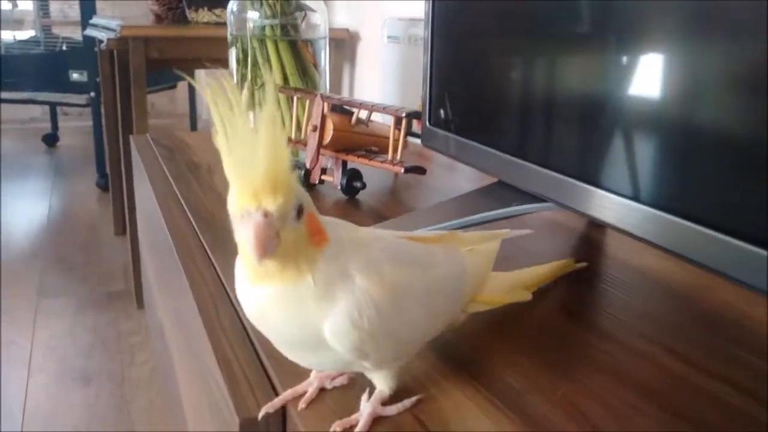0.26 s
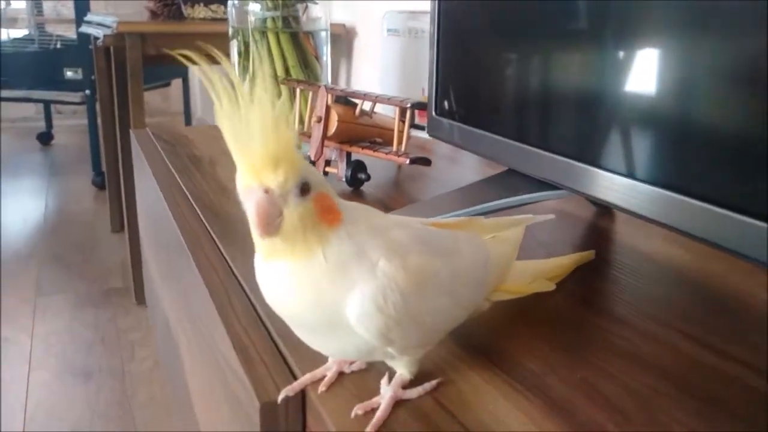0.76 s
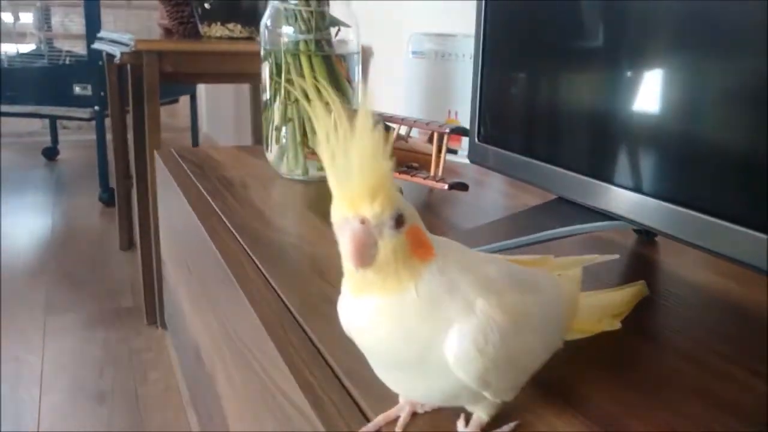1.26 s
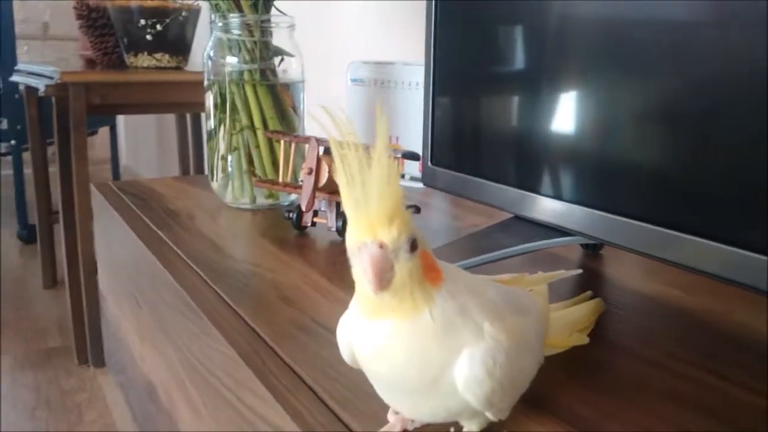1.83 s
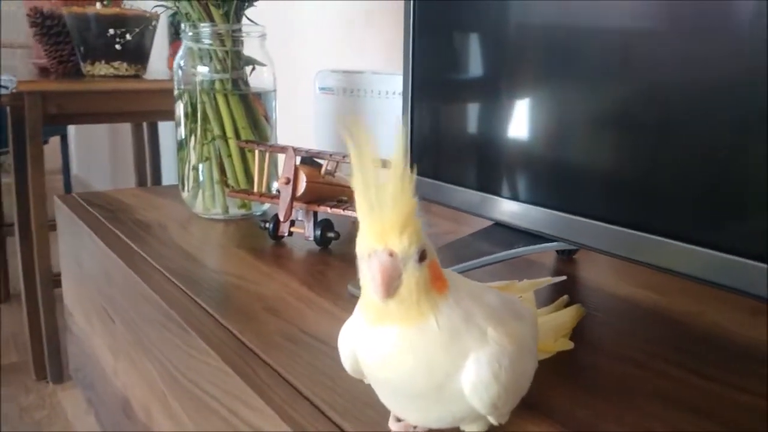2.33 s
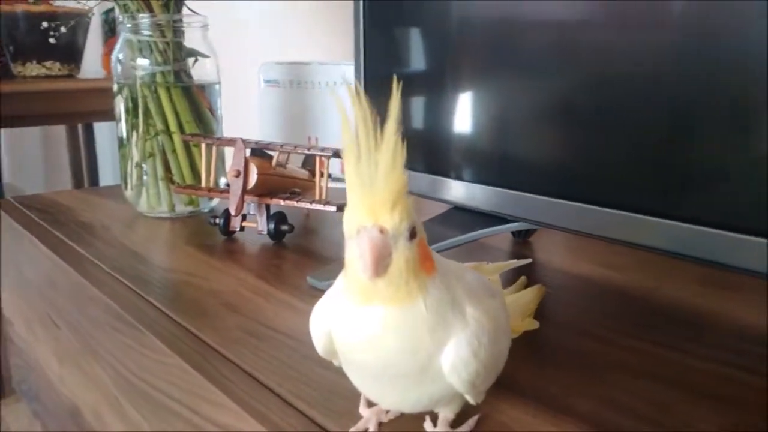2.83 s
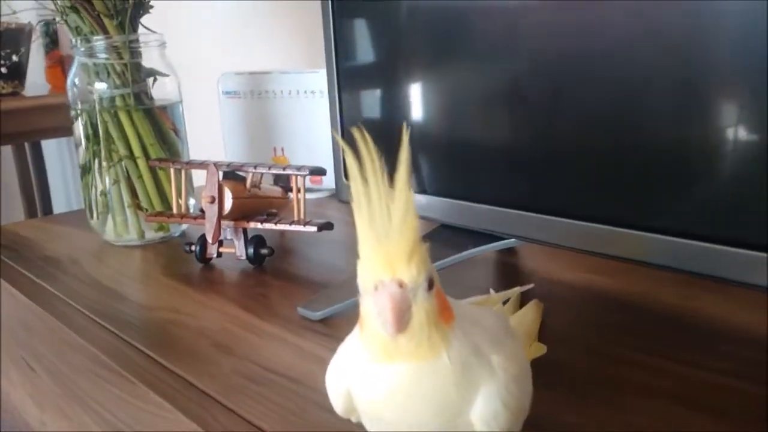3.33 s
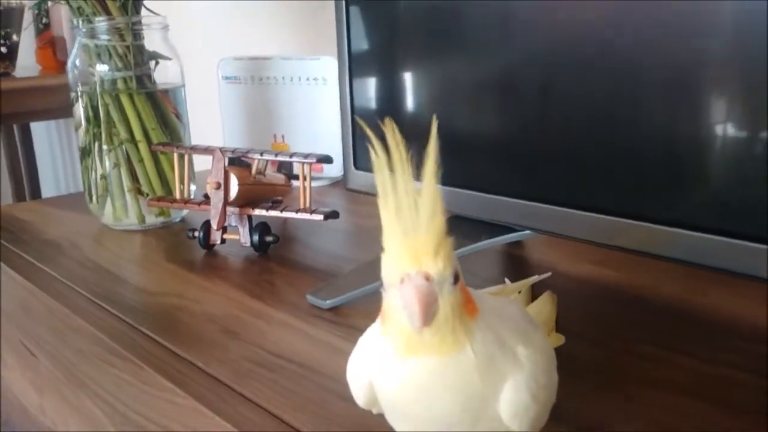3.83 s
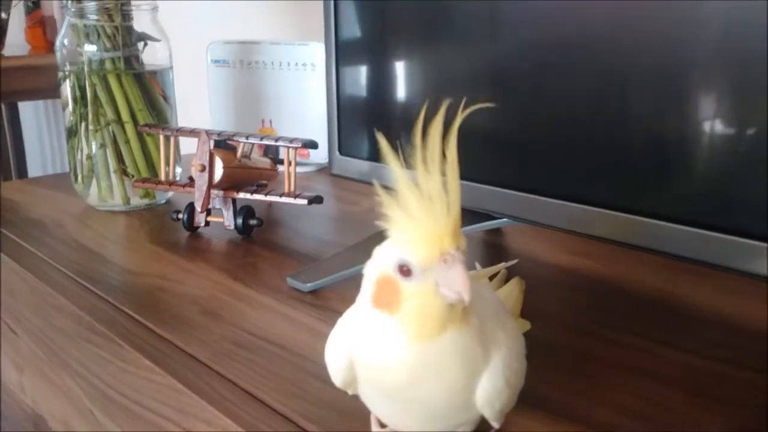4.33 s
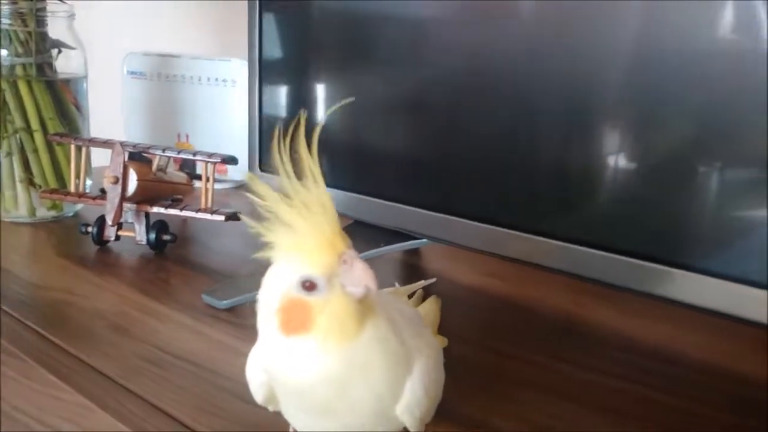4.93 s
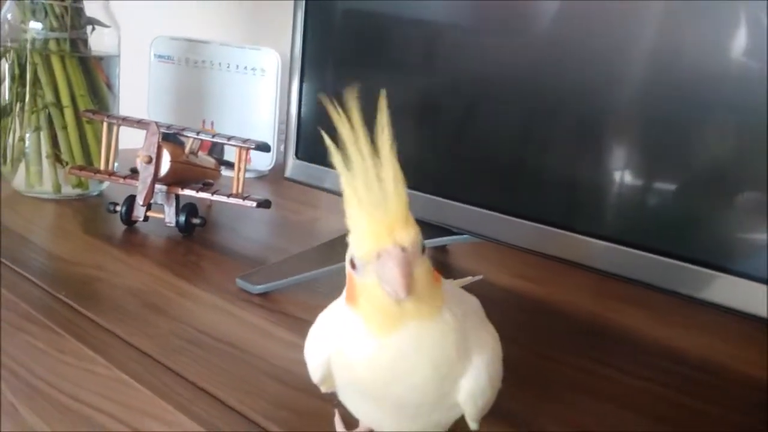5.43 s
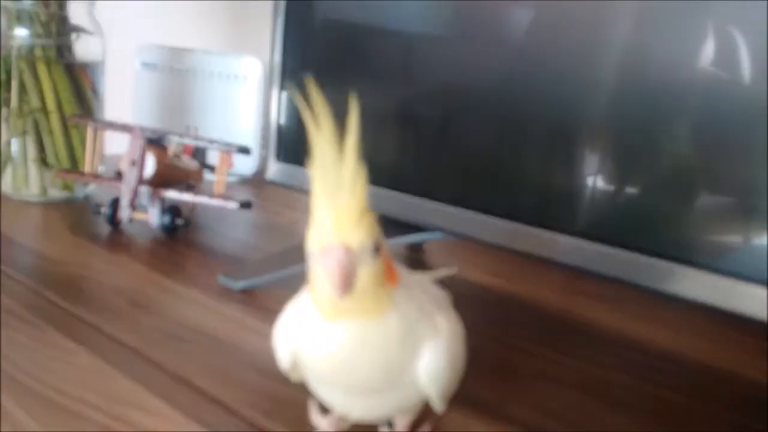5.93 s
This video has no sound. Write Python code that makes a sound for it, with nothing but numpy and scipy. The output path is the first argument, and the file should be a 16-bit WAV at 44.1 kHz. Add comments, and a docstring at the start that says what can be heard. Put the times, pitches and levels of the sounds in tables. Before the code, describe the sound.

Close, whistling pet bird chirps and falling yelps in a quiet room, with small taps on wood and one sharp handling knock.

```python
"""A cockatiel in the living room

A cockatiel on a wooden cabinet makes chirps that end in a harsh dip, high yelps that plunge to one low
note, and soft gliding peeps. Each is a whistle whose overtones (multiples of its pitch) are shaped by
the throat and beak and ring on in the room. Its feet tap the wood, and a hand-held camera close by is
gripped, bumped and clicks. Behind it all are a low hum, a faint hiss and, at the end, a short drone."""
import sys
import numpy as np
from scipy import signal
from scipy.fft import rfft, irfft, next_fast_len
from scipy.io import wavfile

SR = 44100
rng = np.random.default_rng(int(sys.argv[2]) if len(sys.argv) > 2 else 0)


def master_out(mix):
    """Clip the mix to full scale and print it as 16-bit PCM to the path in sys.argv[1]."""
    frames = np.transpose(np.atleast_2d(mix))
    ceiling = np.clip(frames, -1, 1)
    pcm = np.round(ceiling * 32767).astype(np.int16)
    wavfile.write(sys.argv[1], SR, pcm)


N = 272097
TIME = np.arange(N) / SR

# Levels are relative. A lean is left minus right. A ring time is how long a sound takes to fall 60 dB.
# tone colour of the hiss: f/Hz, level/dB
HISS_SPECTRUM = [(1000, -39), (1600, -10.5), (2300, -8), (3100, -2), (3700, -8), (4600, -22.5),
                 (6500, -28.5), (9500, -34), (11500, -27.5), (13300, -22.5), (14400, -21.5), (15700, -29.5)]
# tone colour of the room's hum: f/Hz, level/dB
HUM_SPECTRUM = [(30, -42.5), (60, -24.5), (125, -3.5), (220, -7), (340, 11.5), (410, 7.5), (510, -17.5),
                (620, -0.5), (720, -0.5), (1050, -4), (1600, -11), (2600, -48.5)]
# tones within the hum: f/Hz, level/dB
HUM_TONES = [(129.2, -12), (328.4, -10), (716, -13), (888, -18)]
# how loud the hum is over time: t/s, level/dB
HUM_LEVEL = [(0.0, -44), (0.47, -43.5), (0.86, -40.5), (3.55, -41.5), (4.13, -52), (5.7, -52)]
# first echoes from the cabinet top, a screen and the walls: delay/s, gain
ECHOES = [(.0021, 0.1), (.0062, 0.42), (0.0099, 0.35), (0.0171, 0.18)]
# how long the room rings: f/Hz, ring time/s
ROOM_RING = [(300, 0.94), (1700, 0.48), (3000, 0.46), (5000, 0.36), (8000, 0.21), (14000, 0.18)]
# fingers shift on the camera: t/s, level/dB, rise and fall time/s
FINGER_SHIFTS = [(1.52, -42.5, 0.34), (2.6, -37.5, .045), (3.15, -43, 0.073), (3.72, -54, 0.15)]
# the hand bumps the camera: t/s, level/dB, contact time/s
BUMPS = [(.091, -29, 0.0027), (1.776, -29, 0.0026), (1.813, -31, 0.0033), (2.559, -21.5, 0.0052),
         (2.588, -24.5, 0.003), (2.744, -27.5, 0.0021), (5.5195, -19, 0.0016), (5.743, -32.5, 0.004),
         (5.841, -0.5, 0.0011), (5.896, -19, 0.0011)]
# notes at which the camera's body rings: f/Hz, level/dB, ring time/s
BODY_NOTES = [(64.4, -1.5, 0.066), (153, 10.5, 0.025), (250, 1.5, 0.033), (720, -3.5, 0.028)]
# dry clicks of the camera's shell: t/s, level/dB, contact time/s
CLICKS = [(5.5125, -24, 0.00047), (5.5302, -16, 0.00032)]
# notes at which the shell rings: f/Hz, level/dB, ring time/s
SHELL_NOTES = [(1230, -8, 0.019), (2470, -4, 0.018), (2810, 22, 0.0066), (3280, -3, 0.012)]
# feet land on the cabinet: t/s, level/dB, contact time/s
STEPS = [(2.067, -20, 0.00069), (2.3, -21, 0.00079), (3.664, -24.5, 0.0016), (3.684, -25, 0.0023),
         (3.708, -24, 0.0019), (4.554, -31, 0.002), (4.684, -28.5, 0.0018), (4.724, -28.5, 0.0011),
         (5.715, -26.5, 0.0018)]
# notes at which the wood rings: f/Hz, level/dB, ring time/s
WOOD_NOTES = [(190, -7, 0.01), (379, -2.5, 0.045), (676, -2, 0.031), (950, -33.5, .015)]
# how the throat and beak boost or weaken each frequency: f/Hz, gain/dB
THROAT_GAIN = [(1200, 2), (1750, 9), (2300, 6), (3000, 9), (3700, 8), (4300, 2.5), (4800, -15.5),
               (5300, -14), (6150, -23.5), (6800, -33.5), (7800, -27), (9500, -40.5), (11000, -13),
               (12200, -30), (13800, -1.5), (15700, -24.5)]
# a narrow boost that moves as the beak opens: t/s, f/Hz
BEAK_RESONANCE = [(.46, 5010), (.65, 5510), (1.5, 6750), (3.7, 5990), (4.4, 5770), (5.8, 6000)]
# strength of the calls' very highest treble: t/s, gain/dB
TOP_TREBLE = [(.4, -19), (1.5, -6.5), (1.9, 15.5), (3.2, -3.5), (3.7, -3.5), (4.1, 2), (4.5, -14),
              (6.17, -20)]
# tone colour of air rushing through the beak: f/Hz, level/dB
BREATH_SPECTRUM = [(500, -39), (1300, 9), (2700, 10.5), (4200, 2.5), (6000, -29.5), (9500, -45.5)]
# the bird faces the left microphone, then the camera comes round: t/s, lean of the overtones/dB
FACING = [(0, 6), (1.2, 5), (2, 2.5), (3.7, 1), (6.17, 2.5)]
# chirps (sheen is extra treble above about 5 kHz):
# t/s, length/s, first f/Hz, settled f/Hz, level/dB, overtones/dB, sheen/dB, lean/dB
CHIRPS = [ (0, 0.045, 2510, 1762, -15, -14, 13, 3.5), (.13, 0.062, 2162, 1780, -16.5, -9.5, -0.5, 1),
          (0.301, .054, 1860, 1710, -15, -5, 9.5, -4.5), (0.461, .058, 2055, 1737, -15.5, -12, 18, 0.5),
          (0.635, 0.046, 1923, 1626, -19.5, -19, 7, -1.5), (0.875, .027, 1760, 1608, -20.5, 1.5, 2, -2),
          (1.066, .021, 1520, 1590, -25, -0.5, -15, -1.5), (1.308, .038, 1706, 1605, -24, -6, 8.5, -6),
          (1.48, .074, 1641, 1610, -20.5, -15, 22, -5), (3.844, 0.051, 1918, 1838, -24, -3, 0.5, 2),
          (4.31, 0.072, 2043, 2013, -29.5, 4.5, 3, 4.5), (5.761, 0.066, 1568, 1549, -28.5, 10, 7.5, 0),
          (6.03, 0.036, 1702, 1563, -25, 14, 9.5, -1)]
# yelps: t/s, length/s, high note's length/s, first f/Hz, last high f/Hz,
# level/dB, low note's level/dB, overtones/dB, sheen/dB, lean/dB
YELPS = [ (1.738, 0.067, 0.029, 2154, 2179, -25.5, -22, -17, 3, 2.5),
         (1.877, 0.09, 0.06, 2212, 2060, -23, -26.5, -22, 5, 5),
         (2.396, 0.045, 0.011, 2134, 2030, -34, -14.5, -49, 10, -1.5),
         (3.474, 0.073, 0.035, 2112, 2102, -37, -29.5, -8.5, 2, 5),
         (3.594, .077, 0.023, 2330, 2362, -21, -22.5, 1.5, 0, 2),
         (3.701, 0.073, 0.029, 2814, 2746, -20.5, -26, 3.5, 0.5, -1.5),
         (4.047, 0.29, 0.049, 3029, 2620, -18, -32.5, -2.5, -4.5, 0),
         (4.165, 0.11, 0.028, 3187, 2906, -21, -38.5, -0.5, -7, 0),
         (4.535, 0.13, 0.065, 2930, 2775, -29.5, -29, 3, 4.5, 0.5)]
# peeps: t/s, length/s, first f/Hz, last f/Hz, level/dB, overtones/dB, sheen/dB, lean/dB
PEEPS = [ (1.607, 0.071, 2130, 1989, -22, -26, -18, 5.5), (1.974, 0.098, 1420, 1267, -41.5, -28, 3.5, -3.5),
         (2.533, 0.054, 1353, 1162, -35.5, -18.5, 5.5, -2), (2.747, 0.092, 2081, 1805, -29.5, -23, 16, 6.5),
         (2.763, 0.073, 1736, 1660, -31, -29, -5, -7), (2.82, 0.05, 1980, 2052, -30, -35, 11, 4),
         (2.866, 0.067, 1374, 1180, -35, -28, 5, -1), (3.134, 0.08, 1970, 1772, -32.5, -16, 28.5, -5),
         (3.246, 0.07, 1327, 1216, -35, -22, -4, -0.5), (4.717, 0.039, 2285, 1917, -32, -25, -1, 3)]

HIGHEST_HZ = 15650


def amp(db):
    """Turns decibels into a number to multiply by."""
    return 10 ** (np.asarray(db) / 20)


def unit(x):
    """Scales a signal to an average strength (rms) of 1."""
    return x / np.sqrt(np.mean(x ** 2) + 1e-20)


def ramp(x):
    """Keeps a value between 0 and 1."""
    return np.clip(x, 0, 1)


def read(points, hz):
    """Looks up a table by frequency, blending between rows on a scale of octaves."""
    f, value = np.transpose(points)
    return np.interp(np.log(hz + 1), np.log(f + 1), value)


def follow(rows, t):
    """Looks up a table by time, blending between rows."""
    return np.interp(t, *np.transpose(rows))


def add(mix, s, sound):
    """Adds a sound into the mix at s seconds."""
    part = mix[max(round(s * SR), 0):][:len(sound)]
    part += sound[:len(part)]


def noise(spectrum):
    """Noise of strength 1, coloured by rows of f/Hz, level/dB."""
    size = next_fast_len(N)
    gains = amp(read(spectrum, np.fft.rfftfreq(size, 1 / SR)))
    return unit(irfft(rfft(rng.standard_normal(size)) * gains)[:N])


def wander(rate_hz):
    """Random drift of strength 1, mostly slower than the rate."""
    smooth = signal.butter(2, .6 * rate_hz, fs=SR, output="sos")
    return unit(signal.sosfilt(smooth, rng.standard_normal(N)))


def pair(mid, side):
    """Makes left and right from what they share (mid) and what they do not (side)."""
    return np.array([mid + side, mid - side])


def pan(x, lean_db):
    """Leans a sound to the left, keeping the sum of both sides the same."""
    left = amp(lean_db) / (1 + amp(lean_db))
    return 2 * x * np.reshape([left, 1 - left], (2, -1))


def hiss(level_db=-58.5, side_db=-2):
    """A faint steady hiss, largely unrelated between left and right."""
    return amp(level_db) * pair(noise(HISS_SPECTRUM), amp(side_db) * noise(HISS_SPECTRUM))


def hum(gain_db=1, side_db=-16, drift_hz=1.39):
    """The room's hum: a low rush with a few wavering tones in it."""
    tones = 0
    for hz, db in HUM_TONES:
        cycles = np.cumsum(hz + drift_hz * wander(7.73)) / SR
        tones += amp(db) * np.sqrt(2) * np.sin(2 * np.pi * cycles)
    level = amp(follow(HUM_LEVEL, TIME) + gain_db)
    return level * pair(noise(HUM_SPECTRUM) + tones, amp(side_db) * noise(HUM_SPECTRUM))


def room(x, tail_db=1.5, side_db=-9, build_s=0.0041):
    """The room answers with a few echoes, then a wash of them that is much alike on both sides."""
    hz, t, bands = signal.stft(rng.standard_normal((2, SR)), SR, nperseg=256)
    fade = amp(-60 * t / read(ROOM_RING, hz)[:, None])
    tail = signal.istft(bands * fade, SR, nperseg=256)[1]
    tail *= 1 - np.exp(-(np.arange(tail.shape[1]) / SR / build_s) ** 2)
    mid, side = amp(tail_db) * tail / np.linalg.norm(tail[0])
    for delay, gain in ECHOES:
        add(mid, delay, np.array([gain]))
    return signal.fftconvolve(np.atleast_2d(x), pair(mid, amp(side_db) * side), axes=1)[:, :N]


def drone(start_s=5.966, length_s=.142, pitch_hz=342, level_db=-32.5, throb_hz=34, fade_s=0.004):
    """A low throbbing tone with a little rush; its pitch and level rise and fall in one arch."""
    t = TIME - start_s
    arch = np.sin(np.pi * ramp(t / length_s))
    phase = 2 * np.pi * np.cumsum(pitch_hz * (1 + 0.0487 * arch)) / SR
    tone = unit(np.sin(phase) + amp(-20) * np.sin(2 * phase))
    gate = ramp(t / fade_s) * ramp((length_s - t) / fade_s)
    throb = 1 + 0.27 * np.sin(2 * np.pi * throb_hz * t)
    rush = amp(-15) * noise([(150, -18), (350, -7), (900, -3), (1600, -23.5), (4000, -8.5), (7000, -46)])
    return amp(level_db + 2 * arch) * gate * throb * (tone + rush)


def grip(rest_db=-57, lumpy_db=3):
    """Fingers on the camera make a lumpy rumble that swells each time they shift."""
    rumble = noise([(25, -25), (70, -6), (130, -3.5), (250, -4.0), (500, -21), (2000, -60)])
    shifts = sum(amp(db) * np.exp(-abs(TIME - s) / fade_s) for s, db, fade_s in FINGER_SHIFTS)
    return rumble * (amp(rest_db) + shifts) * amp(lumpy_db * wander(36))


def knocks(blows, notes):
    """Each blow is a short push that makes an object ring; a longer contact sounds duller."""
    out, t = np.zeros(N), np.arange(SR // 4) / SR
    ring = sum(amp(db - 60 * t / ring_s) * np.cos(2 * np.pi * hz * t) for hz, db, ring_s in notes)
    for s, db, contact_s in blows:
        push = np.sin(np.pi * np.minimum(t / contact_s, 1))
        sound = signal.fftconvolve(push, ring)[:len(t)]
        add(out, s, amp(db) * sound / abs(sound).max())
    return out


def handling():
    """Bumps, clicks and finger rumble reach the microphones through the camera's body."""
    return pan(knocks(BUMPS, BODY_NOTES), lean_db=-3) + knocks(CLICKS, SHELL_NOTES) + grip()


def footsteps():
    """The bird's feet tap the cabinet and the wood rings briefly."""
    return knocks(STEPS, WOOD_NOTES)


def delay_right(x, lag_s=.000019):
    """The bird's sound reaches the right microphone a moment after the left."""
    size = next_fast_len(N)
    delay = np.exp(-2j * np.pi * np.fft.rfftfreq(size, 1 / SR) * lag_s)
    return np.array([x[0], irfft(rfft(x[1], size) * delay, size)[:N]])


def throat(hz, start, sheen_db, beak_db=9, beak_width_hz=370, sheen_hz=4850, top_hz=9450):
    """How many dB the throat and beak add to each frequency of one call."""
    beak = beak_db * np.exp(-((hz - follow(BEAK_RESONANCE, start)) / beak_width_hz) ** 2)
    sheen = (sheen_db - 3) / (1 + (sheen_hz / hz) ** 16)
    top = follow(TOP_TREBLE, start) * (hz > top_hz)
    return read(THROAT_GAIN, hz) + beak + sheen + top


def peep(start, length, first_hz, last_hz, level_db, overtone_db, sheen_db, lean_db):
    """Shape of a peep: a soft, nearly pure glide, loudest just past its middle."""
    age = np.arange(0, length, 1 / SR) / length
    hz = first_hz + (last_hz - first_hz) * age
    level = level_db - 7.5 * (2 * (age - 0.56)) ** 2
    return start, hz, level, overtone_db, sheen_db, lean_db


def yelp(start, length, held, first_hz, last_hz, level_db, low_db, overtone_db, sheen_db, lean_db,
         octaves_per_s=17, low_hz=1681, sag_hz_per_s=620, fade_db_per_s=222, low_overtone_db=-27.5):
    """Shape of a yelp: a high note cracks as it plunges, then lands on a pure low note that fades."""
    t = np.arange(0, length, 1 / SR)
    octaves = np.log2(last_hz / low_hz)
    plunge_s = octaves / octaves_per_s
    plunge = ramp((t - held) / plunge_s)
    landed_s = np.maximum(t - held - plunge_s, 0)
    high_hz = first_hz + (last_hz - first_hz) * ramp(t / held) ** 2
    hz = high_hz * (low_hz / last_hz) ** plunge - sag_hz_per_s * landed_s
    high = level_db - 3.5 * ramp(1 - t / 0.0098)  # a quick swell at the start
    low = low_db - fade_db_per_s * landed_s
    crack_db = 27 * octaves * np.sin(np.pi * plunge)  # a longer fall cracks more
    overtones = overtone_db + (low_overtone_db - overtone_db) * plunge ** 2 + crack_db
    return start, hz, high + (low - high) * plunge, overtones, sheen_db, lean_db


def chirp(start, length, first_hz, settled_hz, level_db, overtone_db, sheen_db, lean_db,
          swell_db=5.5, dip_s=.021, dip_share=0.1477, fade_db=1, harsh_db=8):
    """Shape of a chirp: the pitch settles as the whistle swells, then dips into a harsh ending."""
    t = np.arange(0, length, 1 / SR)
    settle = ramp(t / max(length - dip_s, length / 10))
    dip = ramp(1 - (length - t) / dip_s)
    hz = (settled_hz + (first_hz - settled_hz) * (1 - settle) ** 1.7) * (1 - dip_share * dip)
    level = level_db - swell_db * ramp(1 - 2 * t / length) ** 2 - fade_db * dip
    overtones = overtone_db + (harsh_db - overtone_db) * dip
    return start, hz, level, overtones, sheen_db, lean_db


def cockatiel(jitter=0.0096, rasp=0.011, shimmer=0.37, hoarse=0.33, hoarse_hz=260, husk=0.18,
              onset_s=0.0015, bloom_s=0.012, release_s=.004):
    """The bird's voice box whistles each call, turning hoarser as it presses harder."""
    out, waver, flutter = np.zeros((2, N)), wander(730), wander(140)
    breath = amp(-11) * noise(BREATH_SPECTRUM)
    k = np.arange(1, 11)[:, None]  # multiples of the pitch: 1 is the whistle, the rest are overtones
    halo = np.array([wander(hoarse_hz) + 1j * wander(hoarse_hz) for _ in k]) / np.sqrt(2)
    calls = [chirp(*row) for row in CHIRPS] + [yelp(*row) for row in YELPS]
    calls += [peep(*row) for row in PEEPS]
    for start, hz, level_db, overtone_db, sheen_db, lean_db in calls:
        t = np.arange(len(hz)) / SR
        at = (round(start * SR) + np.arange(len(hz))) % N
        age = t / t[-1]
        press = age * amp(overtone_db) / (1 + amp(overtone_db))
        hz = hz * (1 + (jitter + rasp * press) * waver[at])
        # each tone blurs into a halo of noise, more so high up and late in the call
        blur = np.minimum(hoarse * (age ** 2 + 0.099) * k ** 1.3, .95)
        grain = np.sqrt(1 - blur ** 2) + blur * halo[:, at]
        db_per_octave = -7 - 5 * ramp(1 - t / bloom_s)  # high overtones come in late
        source_db = (k > 1) * (overtone_db + db_per_octave * np.log2(k / 2))
        gains = amp(source_db + throat(k * hz, start, sheen_db)) * (k * hz < HIGHEST_HZ)
        gains /= np.sqrt((gains ** 2).sum(0) / 2)
        whistle, *overtones = (gains * grain * np.exp(2j * np.pi * k * np.cumsum(hz) / SR)).real
        rough = sum(overtones) + (husk * age + press) * breath[at]
        # whistle and overtones bounce off the cabinet differently into each microphone
        voice = pan(whistle, lean_db) + pan(rough, follow(FACING, start))
        gate = ramp(t / onset_s) * ramp((t[-1] - t) / release_s)
        loudness = amp(level_db) * np.sin(np.pi / 2 * gate) ** 2 * (1 + shimmer * flutter[at])
        for channel, sound in zip(out, voice):
            add(channel, start, sound * loudness)
    return out


def scene(bird_db=-4.94, step_room_db=-15, drone_room_db=-16, direct_hz=4500):
    """Bird, feet and drone echo in the room; hum, camera noises and hiss join them."""
    bird, steps, low_drone = amp(bird_db) * cockatiel(), footsteps(), drone()
    # the beak aims its treble past the camera, so that part arrives mostly by way of the walls
    direct = signal.sosfilt(signal.butter(1, direct_hz, fs=SR, output="sos"), bird)
    calls = delay_right(direct + room(bird))
    echoes = room(amp(step_room_db) * steps + amp(drone_room_db) * low_drone)
    return calls + steps + low_drone + echoes + hum() + handling() + hiss()


def record(dry, low_cut_hz=53):
    """The microphones lose the deepest bass and the highest treble."""
    thinned = signal.sosfilt(signal.butter(4, low_cut_hz, "high", fs=SR, output="sos"), dry)
    treble_cut = signal.firwin(511, HIGHEST_HZ, window=("kaiser", 9), fs=SR)
    return signal.oaconvolve(thinned, treble_cut[None], "same")


dry = scene()
out = record(dry)
master_out(out)
```